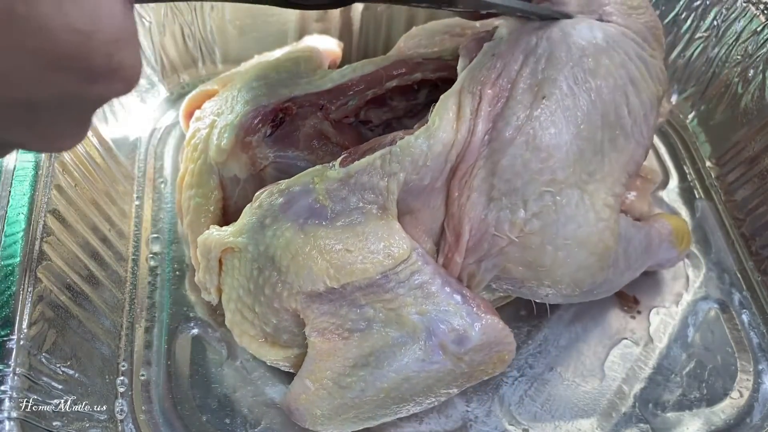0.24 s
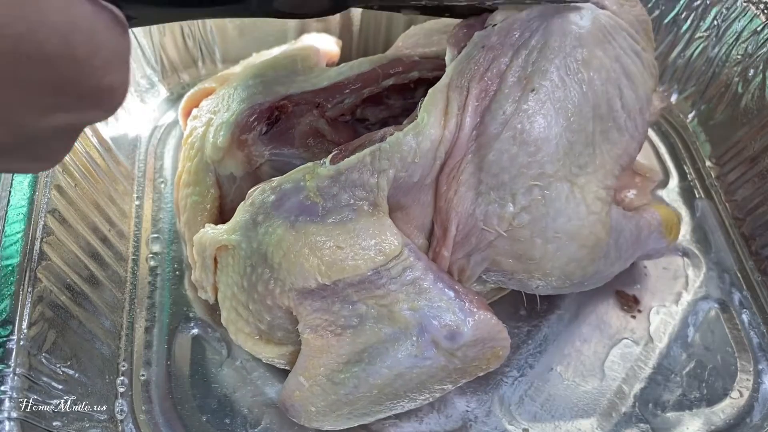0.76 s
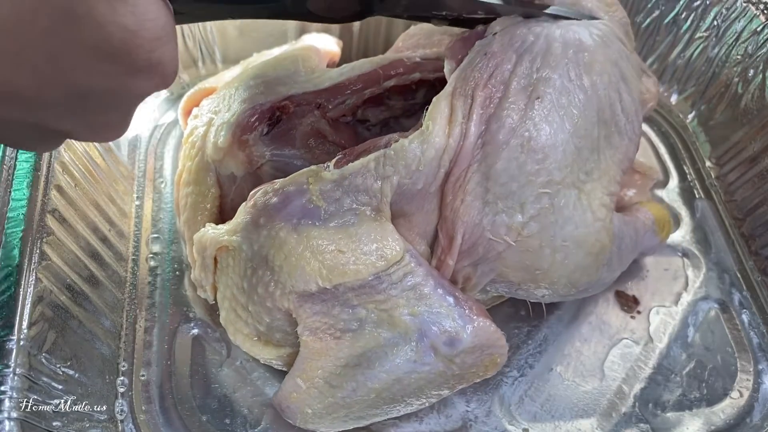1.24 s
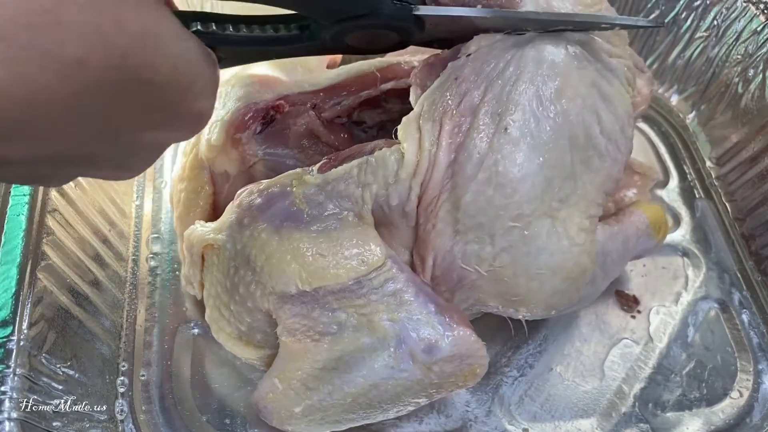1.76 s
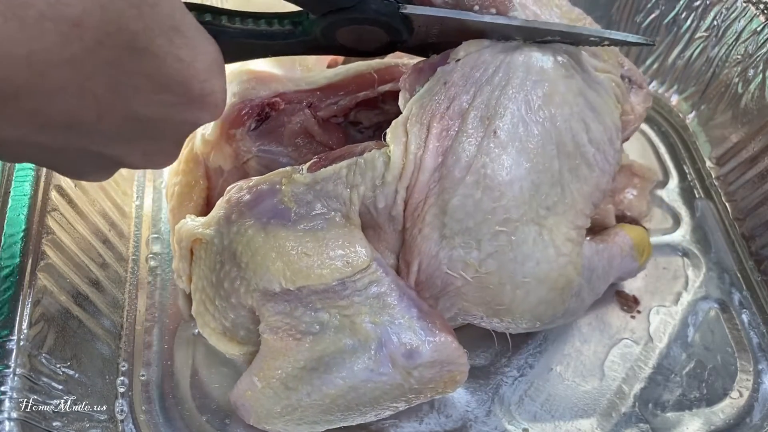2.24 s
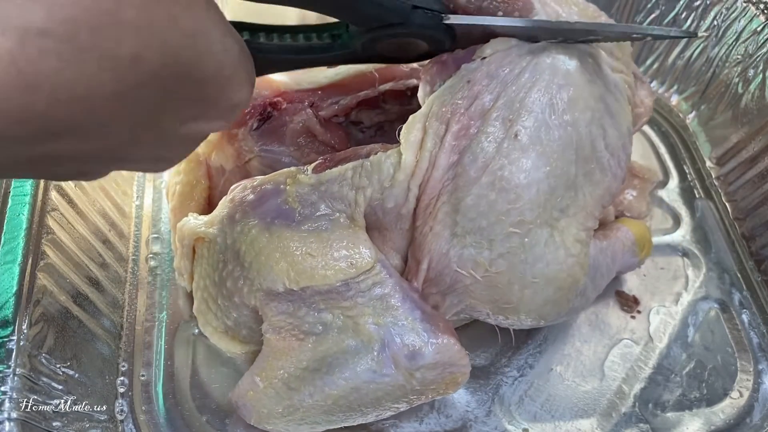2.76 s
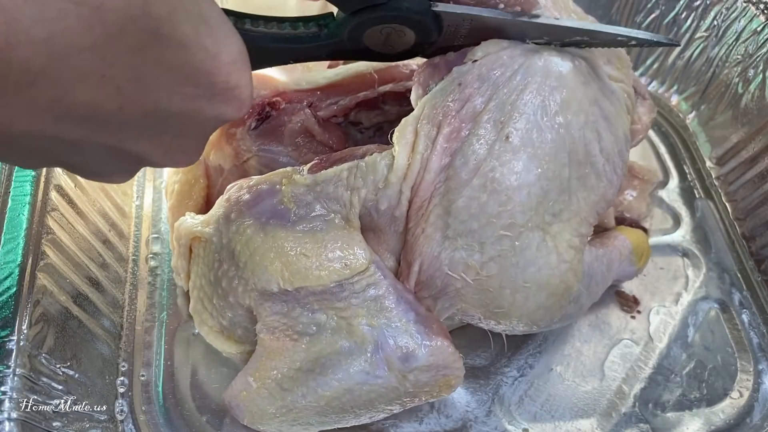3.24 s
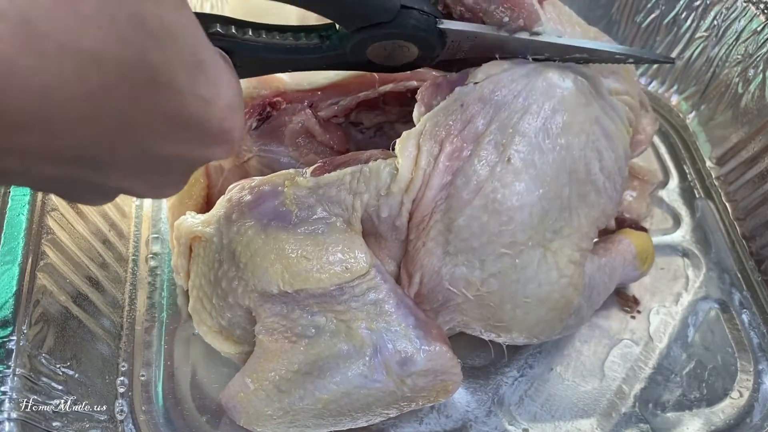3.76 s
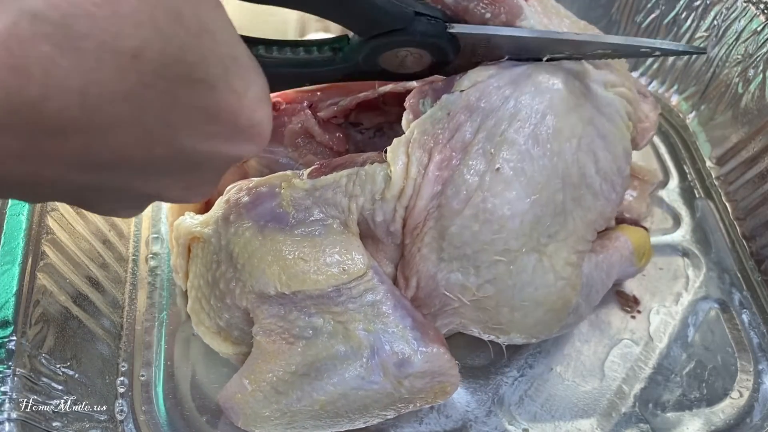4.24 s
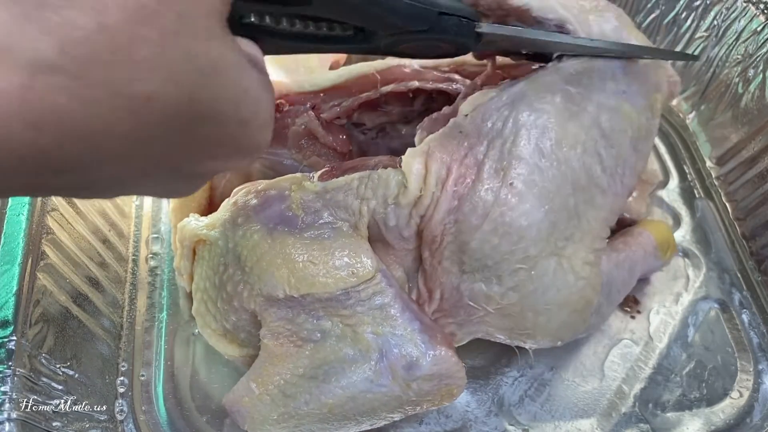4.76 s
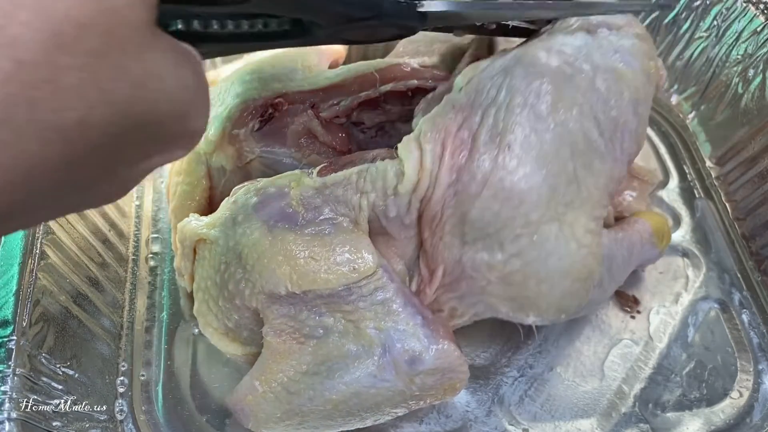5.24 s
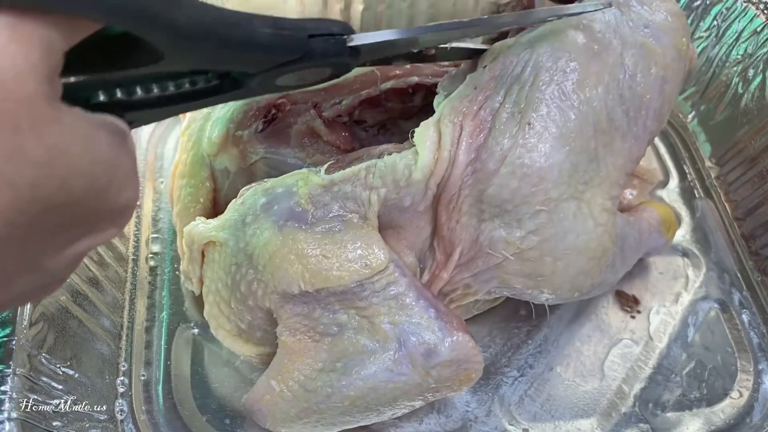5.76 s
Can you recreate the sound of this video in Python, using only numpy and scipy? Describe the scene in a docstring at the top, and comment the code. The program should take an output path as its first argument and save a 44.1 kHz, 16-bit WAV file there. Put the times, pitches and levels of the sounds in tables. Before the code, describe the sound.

Over the steady low hum of an appliance in a small kitchen, shears squeeze into raw chicken with quiet, moist squishes and scattered little clicks. A thin rib crunches near the start. The cutting grows busier and two bones snap about a second apart, the second loudest, with the meat slumping softly onto its foil tray. Small wet ticks carry on afterwards, all heard close up.

```python
"""Wet skin crackles and ticks as kitchen shears work through a raw chicken in a foil tray, close to
a two-port microphone. Films of moisture pop, gristle tears, and the steel rubs and squeaks on skin.
A thin rib crunches early on; later two bones crack, ringing the blades, and after the last the
carcass slumps onto the tray. The foil throws back quick echoes. Behind it all an appliance hums
in the small kitchen."""
import sys
import numpy as np
from scipy import signal
from scipy.fft import rfft, irfft, next_fast_len
from scipy.io import wavfile
from scipy.ndimage import uniform_filter1d

SR = 44100
rng = np.random.default_rng(int(sys.argv[2]) if len(sys.argv) > 2 else 0)


def dump_mix(stems):
    """Bounce the given channels to the path in sys.argv[1] as a 16-bit WAV at rate SR."""
    frames = np.atleast_2d(stems).T  # one column per channel
    limited = np.clip(frames, -1, 1)  # hard clip at full scale
    pcm = np.round(limited * 32767).astype(np.int16)
    wavfile.write(sys.argv[1], SR, pcm)


N = 264159
TIME = np.arange(N) / SR
FFT_SIZE = next_fast_len(N, real=True)
HZ = np.fft.rfftfreq(FFT_SIZE, 1 / SR)

# gristle and wet skin giving way, the snaps that stand out: t/s, level/dB, tissue f/Hz
SKIN_SNAPS = [(0.1857, -60, 11000), (0.2025, -58, 11600), (0.4275, -68, 12400), (0.499, -61.5, 11800),
              (0.565, -54.5, 2800), (0.681, -70, 13000), (0.8354, -67, 8060), (1.011, -62.5, 13500),
              (1.3005, -59.5, 13500), (1.3496, -60, 7900), (1.4653, -65, 5000), (1.5882, -59.5, 13400),
              (1.758, -52, 13500), (1.7672, -50.5, 10900), (1.9146, -54, 9700), (2.129, -60, 11400),
              (2.5043, -58.5, 3500), (2.524, -58, 4000), (2.5453, -59.5, 7640), (2.6644, -54.5, 10500),
              (2.683, -49, 9900), (2.7947, -62, 4400), (2.8917, -58, 3100), (2.9011, -56, 4300),
              (3.2478, -56.5, 6640), (3.3447, -55, 7960), (3.3521, -57.5, 6740), (3.3728, -59, 7950),
              (3.413, -44.5, 8000), (3.475, -51, 9600), (3.4896, -50, 10900), (3.6881, -50.5, 12100),
              (3.7959, -65, 12000), (3.949, -59, 4530), (4.1912, -52, 7300), (4.21, -56, 9500),
              (4.2322, -45, 9200), (4.2603, -48.5, 10000), (4.3718, -50, 9800), (4.443, -47.5, 11400),
              (4.452, -51.5, 7000), (4.494, -54, 10200), (4.607, -40.5, 10100), (4.621, -47, 10460),
              (4.873, -61, 10100), (4.9768, -55.5, 8050), (5.0597, -60, 7020), (5.078, -55, 7000),
              (5.1078, -62, 7000), (5.1524, -62, 10500), (5.178, -58, 12000), (5.241, -55.5, 7200),
              (5.3007, -57, 3930), (5.329, -57.5, 7100), (5.378, -58.5, 7000), (5.4367, -57.5, 6970),
              (5.6065, -66.5, 8160)]
# steps of fracture in bone: t/s, level/dB, decay/s, extra treble/dB, extra body/dB, splinter f/Hz
FRACTURES = [(0.301, -49, .0011, 4, 17, 1040), (.3068, -52, .003, -2, 9, 1100),
             (0.3195, -48.5, 0.0024, 2, 12, 2500), (3.447, -41.5, .0016, -8.5, -1, 4900),
             (3.451, -40, 0.00102, 2.5, -2, 1030), (3.4548, -30.5, 0.0015, -1, -4, 3040),
             (3.456, -27.5, 0.0017, -2.5, -8, 4900), (3.462, -40.5, 0.0052, 4, 4.5, 3570),
             (4.3266, -35.5, 0.0014, 0, -11, 5400), (4.561, -37, .002, -2, -1, 7400),
             (4.5651, -18, .0011, -1.5, -0.5, 7400), (4.5671, -16.5, .0014, 0, -0.5, 7020),
             (4.5731, -31.5, 0.0033, -1.5, 5, 1750)]
# wet skin squeaking on steel: t/s, level/dB, f/Hz, width/Hz, length/s
SKIN_SQUEAKS = [(0.284, -54, 8300, 700, 0.075), (1.345, -58, 7650, 350, 0.016),
                (1.859, -64.5, 3230, 300, 0.015), (4.176, -66, 7260, 400, 0.13)]
# blades squeezing into flesh, and sliding along it: t/s, rise/s, hold/s, relative level/dB
BLADE_SQUEEZES = [(0, 0.0087, 0.094, -70), (.155, .04, 0.011, -56), (.22, 0.09, 0.02, -55.5),
                  (.455, 0.021, .11, -70.5), (.88, .03, 0.36, -81.5), (1.19, 0.19, 0.062, -66.5),
                  (1.74, 0.018, 0.095, -59), (1.89, .02, 0.24, -76), (2.48, 0.052, 0.07, -67.5),
                  (2.62, 0.042, 0.052, -65), (2.76, 0.033, 0.022, -70), (2.885, 0.011, .012, -64.5),
                  (2.99, .02, .17, -76), (3.22, 0.06, 0.12, -69), (3.425, 0.037, .015, -49.5),
                  (3.685, .012, .008, -65), (3.9, 0.096, 0.049, -63), (4.175, .05, 0.13, -55.5),
                  (4.41, 0.027, 0.0151, -54), (4.51, .03, .02, -60.5), (4.565, 0.022, 0.02, -45),
                  (4.79, 0.083, 0.017, -65), (4.94, 0.032, 0.52, -70.5), (5.23, 0.036, 0.024, -62.5),
                  (5.52, 0.057, .03, -69)]
BLADE_STROKES = [(.17, 0.02, .02, -57.5), (.26, 0.045, .025, -57), (1.68, 0.089, 0.087, -62),
                 (3.88, 0.085, 0.07, -61), (4.1, .1, 0.15, -65), (5.17, 0.074, 0.036, -64.5)]
# spectra of splitting bone, wet tissue, friction and slapping flesh: f/Hz, relative level/dB
BONE_SPECTRUM = [(100, -10.5), (600, -16.5), (1100, -12), (1700, -13.5), (2600, -11.5), (4000, -7.5),
                 (5500, -14.5), (7300, 0), (8800, -3), (11500, -5), (14000, -15), (15500, -10),
                 (16500, -33.5)]
WET_SPECTRUM = [(200, -21), (1000, -11), (2500, -16), (4500, -4.5), (6000, -4.5), (7400, 1), (8800, -1.5),
                (11300, -4), (13500, -6), (15400, -10), (16500, -22)]
RUB_SPECTRUM = [(200, -16), (700, -5.5), (1100, -1.5), (2400, -6.5), (4000, -10), (7000, -15), (16000, -32)]
FLESH_SPECTRUM = [(40, -4), (120, 11), (350, -3.5), (600, -8.5), (1050, -9), (1600, -21.5), (3000, -17.5),
                  (8000, -40), (16000, -65)]
# modes of the shears held in the meat, and of the loaded tray: f/Hz, relative level/dB, t60/s
BLADE_MODES = [(964, -21.5, 0.039), (1175, -16, 0.049), (1843, -15.5, 0.018), (4300, -16.5, .015),
               (5034, -13.5, 0.018), (5365, -6, 0.028), (5950, -20, 0.061), (6750, -11.5, 0.031),
               (6914, -8, 0.013), (7380, -9.5, 0.014), (9850, -8.5, .02), (11650, -14, .02),
               (14200, -18, .02)]
TRAY_MODES = [(149, -4.5, .15), (307.7, -1, 0.11), (407, 7, 0.094), (733, 2.5, 0.06), (825, 0, 0.097),
              (1066, 0.5, 0.06), (1350, -3, .06), (1600, -9, 0.079), (2150, -4, 0.045)]
# left microphone port against the right, for close sound: f/Hz, phase lead/rad
PORT_LEAD = [(50, 0), (400, .5), (1100, .8), (2000, .7), (5000, .55), (7100, -.15), (8100, -1.5),
             (9050, -3.14), (10400, -5.4), (11700, -7), (13300, -9.4), (14600, -12.1), (16600, -12.8)]
# balance of the ports: f/Hz, left minus right/dB
PORT_TILT = [(100, 2.5), (400, 0.5), (2000, 0.5), (5200, 5.5), (7200, 1.5), (10000, -1), (16000, 0.5)]
# reverberation of the kitchen: f/Hz, t60/s
ROOM_DECAY = [(100, 0.31), (1000, 0.36), (5000, 0.16), (10000, 0.09), (16000, 0.11)]
# appliance motor lines: f/Hz, level/dB, waver/0-1, left-right phase/rad
MOTOR_LINES = [(84.6, -61, 0, 1), (119.8, -48, 0.07, -0.01), (157.7, -62, 0.4, 1.26), (239, -66.5, 0, 0.66),
               (333, -75.5, 0, -0.46), (405, -75, .6, 1), (490, -75, 0.7, -3), (595.4, -70, 0.1, 1.68),
               (827, -69, 1, 2.5), (1152, -77.5, 0.94, 4.5), (1372, -75, 0.6, 1.5), (1478, -74.5, 0.04, 2)]
# moving air, common to both ports and opposite in them: f/Hz, relative level/dB
AIR_COMMON = [(15, -34.5), (30, -21.5), (45, 2), (80, 5.5), (135, -1), (200, -5), (300, -9.5), (520, -14),
              (680, -13.5), (1050, -22.5), (2300, -17), (2900, -25), (5000, -31), (8000, -51), (16000, -51)]
AIR_OPPOSED = [(15, -21.5), (50, 0.5), (200, 2), (400, 0.5), (700, -4.5), (1500, -2.5), (2150, -8),
               (2700, -15.5), (4500, -22), (8000, -36), (16000, -36.5)]

RESTING_DB = -83.5  # wet skin keeps crackling faintly under the grip


def squish(range_db=15, trim_db=-5, fizz=0.7, count=3000):
    """Films of moisture pop in dense grains of many pitches, over a fine fizz of parting fibres."""
    pops = [signal.fftconvolve(tear(.0009), colour(WET_SPECTRUM, hz, peak_db=10))[:512]
            for hz in np.geomspace(3800, 15000, 20)]
    grains = np.zeros(N)
    for when, pitch, smallness in rng.random((count, 3)):
        add(grains, when * N / SR, gain_of(-range_db * smallness) * pops[int(pitch * len(pops))])
    pressure = np.hypot(effort(BLADE_SQUEEZES), gain_of(RESTING_DB))
    return gain_of(trim_db) * pressure * (unit_rms(grains) + fizz * noise(WET_SPECTRUM))


def snap(hz):
    """One small tear: thin films snap high and bright, thick gristle low and full."""
    treble_db = max(17 * np.log2(hz / 9000), -8.5)
    body_db = -2 + 15 * max(np.log2(6800 / hz), 0)
    return signal.fftconvolve(tear(.0013), colour(WET_SPECTRUM, hz, 8, treble_db, body_db))


def ticks():
    """Skin and gristle give way in single snaps that stand out of the crackle."""
    out = np.zeros(N)
    for start, db, hz in SKIN_SNAPS:
        add(out, start, at_level(snap(hz), db))
    return out


def patter(low_hz=6000, high_hz=13500, range_db=8, follow=0.63, count=70):
    """Lesser snaps come by chance, louder while the blades squeeze."""
    out = np.zeros(N)
    squeeze = unit_rms(effort(BLADE_SQUEEZES) + gain_of(RESTING_DB))
    for when, pitch, smallness in rng.random((count, 3)):
        hz = low_hz * (high_hz / low_hz) ** pitch
        tick = at_level(snap(hz), -61 - range_db * smallness)
        add(out, when * N / SR, tick * squeeze[int(when * N)] ** follow)
    return out


def bone_cracks(ring_share=0.56, hardest_db=-16.5, ring_growth=.55):
    """Bone splits in a few steps; each jolts the blades, and harder ones carry more of their ring."""
    out, t = np.zeros(N), np.arange(8191) / SR
    for start, db, decay, treble_db, body_db, splinter_hz in FRACTURES:
        split = signal.fftconvolve(tear(decay), colour(BONE_SPECTRUM, splinter_hz, 10, treble_db, body_db))
        ring = ringing(BLADE_MODES, t)
        ring *= 1 - np.exp(-t / 0.00022)  # the steel takes up the blow
        crack = ring_share * at_level(ring, ring_growth * (db - hardest_db))
        add(crack, 0, at_level(split, 0))
        add(out, start, at_level(crack, db))
    return out


def slump(start_hz=800, end_hz=215, settle_s=0.0049, push_hz=60):
    """The freed blades push the carcass; it slaps onto the tray, its thud falling in pitch as it settles."""
    out, t = np.zeros(N), np.arange(SR // 4) / SR
    push = -gain_of(-30) * np.sin(2 * np.pi * push_hz * t) * np.exp(-t / .022)
    add(out, 4.5725, push)
    hz = end_hz + (start_hz - end_hz) * np.exp(-t / settle_s)
    thud = np.sin(2 * np.pi * np.cumsum(hz) / SR) * np.exp(-t / 0.031)
    slap = noise(FLESH_SPECTRUM)[:len(t)] * np.exp(-t / 0.028)
    landing = gain_of(-36) * thud + gain_of(-34) * slap + gain_of(-36) * ringing(TRAY_MODES, t)
    add(out, 4.5945, landing * (1 - np.exp(-t / 0.0026)))
    return out


def squeaks():
    """Wet skin slips irregularly on the steel and rings one narrow resonance."""
    out = np.zeros(N)
    for start, db, hz, width_hz, length in SKIN_SQUEAKS:
        size = int(length * SR)
        slips = rng.standard_normal(size) * np.hanning(size)
        band = np.exp(-((np.fft.rfftfreq(size, 1 / SR) - hz) / width_hz) ** 2)
        add(out, start, gain_of(db) * unit_rms(irfft(rfft(slips) * band, size)))
    return out


def slide(rough_db=2, trim_db=-2):
    """The shears rub along the carcass: gritty friction, duller than the wet crackle."""
    grit = noise(RUB_SPECTRUM) * gain_of(rough_db * drift(270))
    return gain_of(trim_db) * effort(BLADE_STROKES) * unit_rms(grit)


def effort(moves, release_db_per_s=269):
    """Each move of the hand builds, holds and fades as the flesh relaxes; overlaps add in power."""
    power = np.zeros(N)
    for start, rise, hold, db in moves:
        age = TIME - start
        released_db = release_db_per_s * np.maximum(age - rise - hold, 0)
        power += (np.clip(age / rise, 0, 1) * gain_of(db - released_db)) ** 2
    return np.sqrt(power)


def tear(decay_s, size=2048):
    """A quick run of tiny breaks that swells and dies away, its energy spread over all pitches."""
    age = np.arange(size) / SR / decay_s
    swell = np.sqrt(age) * np.exp(-age)
    breaks = rfft(rng.standard_normal(size) * swell)
    return irfft(breaks / np.sqrt(abs(breaks) + 1e-9)) * swell ** .25


def colour(spectrum, hz, peak_db, treble_db=0, body_db=0, width=0.094, size=2048):
    """Minimum-phase response of tissue: a spectrum, one resonance, and shelves for treble and body."""
    f = abs(np.fft.fftfreq(size, 1 / SR)) + 1
    shelves = treble_db / (1 + (8700 / f) ** 8) + body_db / (1 + (f / 3200) ** 6)
    resonance = peak_db / (1 + (np.log(f / hz) / width) ** 2)
    log_gain = np.log(gain_of(curve_at(spectrum, f) + shelves + resonance))
    return np.fft.ifft(np.exp(np.conj(signal.hilbert(log_gain)))).real


def ringing(modes, t):
    """Struck metal rings in decaying modes of random phase."""
    return sum(gain_of(db - 60 * t / t60) * np.sin(2 * np.pi * (hz * t + rng.random()))
               for hz, db, t60 in modes)


def ports(sound):
    """Close sound reaches the two microphone ports with a phase and level that depend on pitch."""
    left = np.exp(.5j * curve_at(PORT_LEAD, HZ)) * gain_of(curve_at(PORT_TILT, HZ) / 2)
    norm = np.sqrt((abs(left) ** 2 + abs(left) ** -2) / 2)
    return irfft(rfft(sound, FFT_SIZE) * np.array([left, 1 / left]) / norm, FFT_SIZE)[:, :N]


def tray(sound, echo_db=-15, decay_s=0.0075, scatter_db=-9, scatter_hz=3000):
    """Direct sound plus quick echoes off the foil walls; the duller ones differ from port to port."""
    t = np.arange(2000) / SR
    taps = rng.standard_normal((3, len(t))) * (rng.random((3, len(t))) < .1)
    taps *= (t > .002) * np.exp(-t / decay_s)
    taps /= np.linalg.norm(taps, axis=1)[:, None]
    echoes = signal.oaconvolve(sound[None], taps, axes=1)[:, :N]
    dull = signal.lfilter(*signal.butter(1, scatter_hz, fs=SR), echoes[1:])
    return ports(sound + gain_of(echo_db) * echoes[0]) + gain_of(scatter_db) * dull


def kitchen(sound, room_db=-24):
    """The small room answers with a short diffuse tail, different at each port."""
    taps = rng.standard_normal((2, SR // 2)) * (np.arange(SR // 2) > .008 * SR)
    hz, t, bands = signal.stft(taps, SR, nperseg=256)
    fade = gain_of(-60 * t / curve_at(ROOM_DECAY, hz)[:, None])
    tail = signal.istft(bands * fade, SR, nperseg=256)[1]
    tail /= np.linalg.norm(tail[0])
    return gain_of(room_db) * signal.fftconvolve(sound[None], tail, axes=1)[:, :N]


def appliance(waver_hz=5, hum_lean_db=-0.73, air_lean_db=1.92):
    """In the background: mains hum and wavering motor lines a little right, rushing air a little left."""
    sides, hum = np.array([[1], [-1]]), np.zeros((2, N))
    for hz, db, waver, phase in MOTOR_LINES:
        sway = np.sqrt(1 - waver ** 2) + waver * (drift(waver_hz) + 1j * drift(waver_hz)) / np.sqrt(2)
        line = sway * np.exp(2j * np.pi * (hz * TIME + rng.random()))
        hum += np.sqrt(2) * gain_of(db) * (line * np.exp(.5j * phase * sides)).real
    air = gain_of(-57) * noise(AIR_COMMON) + sides * gain_of(-63) * noise(AIR_OPPOSED)
    return hum * gain_of(hum_lean_db * sides) + air * gain_of(air_lean_db * sides)


def noise(spectrum):
    """Noise of unit rms with the given spectrum."""
    white = rfft(rng.standard_normal(FFT_SIZE))
    return unit_rms(irfft(white * gain_of(curve_at(spectrum, HZ)), FFT_SIZE)[:N])


def drift(hz):
    """Random wander of unit rms, no faster than about hz."""
    steps = uniform_filter1d(rng.standard_normal(8192), 3)
    return unit_rms(np.interp(TIME * hz * 4, np.arange(len(steps)), steps))


def at_level(sound, db):
    """Gives a short sound the energy of 5 ms at that level."""
    return gain_of(db) * sound * np.sqrt(.005 * SR / np.sum(sound ** 2))


def curve_at(points, hz):
    """Interpolates a table along log frequency."""
    f, value = np.transpose(points)
    return np.interp(np.log(hz + 1), np.log(f + 1), value)


def gain_of(db):
    return 10 ** (np.asarray(db) / 20)


def unit_rms(sound):
    return sound / np.sqrt(np.mean(sound ** 2) + 1e-20)


def add(mix, start_s, sound):
    part = mix[round(start_s * SR):][:len(sound)]
    part += sound[:len(part)]


def scene():
    """The cutting in its tray close to the microphone, the kitchen around it, the hum behind."""
    close = ticks() + bone_cracks() + squish() + squeaks() + slide() + slump() + patter()
    return tray(close) + kitchen(close) + appliance()


def record(dry):
    """The recorder cuts the treble above 16.3 kHz."""
    lowpass = signal.firwin(511, 16300, window=("kaiser", 9), fs=SR)
    return signal.oaconvolve(dry, lowpass[None], "same")


dry = scene()
out = record(dry)
dump_mix(out)
```